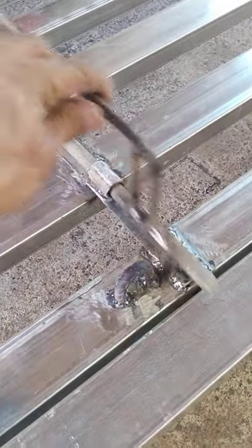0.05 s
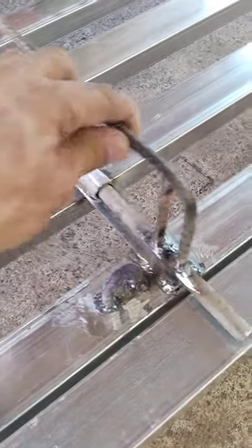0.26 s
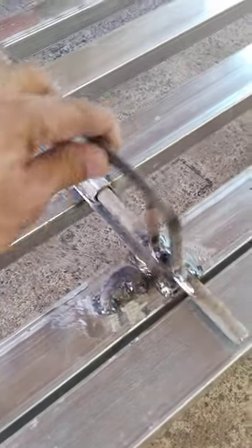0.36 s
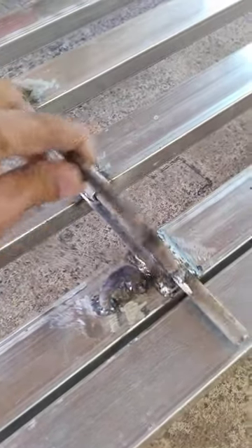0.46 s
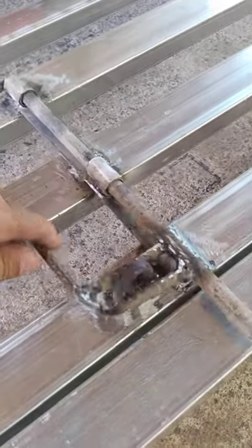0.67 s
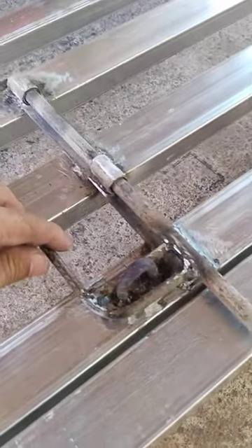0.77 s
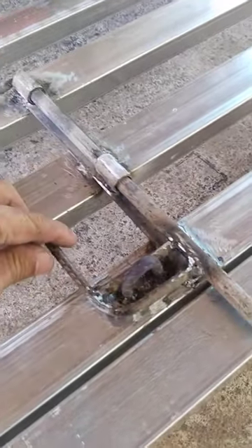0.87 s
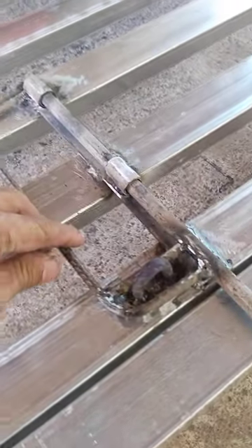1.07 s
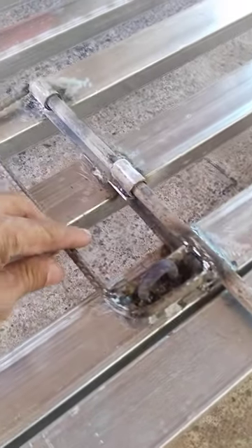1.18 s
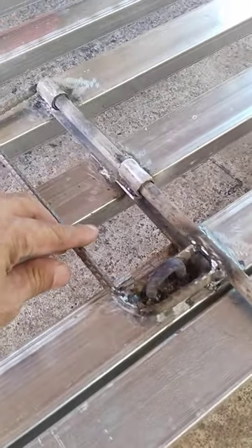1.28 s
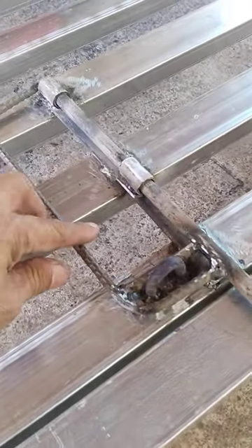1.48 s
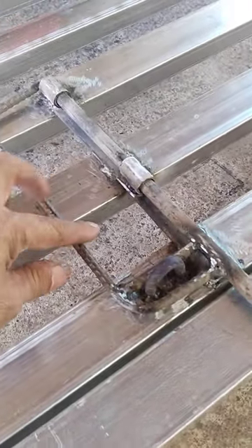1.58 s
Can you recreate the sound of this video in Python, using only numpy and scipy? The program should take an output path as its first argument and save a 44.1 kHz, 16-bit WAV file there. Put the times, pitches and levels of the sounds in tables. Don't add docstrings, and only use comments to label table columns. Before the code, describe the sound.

A steel gate bolt is slid shut, heard close on a phone microphone with slightly dulled treble. Low workshop hum and an earlier knock's fading ring open it. A gritty scrape from about 0.15 seconds ends in a hard knock at 0.29. From 0.6 the handle rubs, ticks and squeaks faintly, then clanks brightly at 0.88, and the welded tubes ring densely, dying away to the end.

```python
import sys
import numpy as np
from scipy import signal
from scipy.fft import rfft, irfft, next_fast_len
from scipy.io import wavfile
from scipy.ndimage import map_coordinates

SR = 44100
rng = np.random.default_rng(int(sys.argv[2]) if len(sys.argv) > 2 else 0)


def amp(db):
    return 10 ** (np.asarray(db, float) / 20)


def write(x):
    x = np.atleast_2d(x).T
    wavfile.write(sys.argv[1], SR, np.round(np.clip(x, -1, 1) * 32767).astype(np.int16))


N = 72765
LEAD = SR // 2

# start_s [s], strength_db [dB], hardness_corner_hz [Hz], chatter_s [s]
CONTACTS = [(.003, -47, 2000, 0.011), (.087, -50, 900, .002), (.2845, -17.5, 4000, .002),
            (.2905, -16.5, 2450, .004), (.2965, -18, 3000, 0.0048), (.666, -37.5, 1000, 0.0022),
            (.705, -44, 1180, .002), (.717, -37, 1600, 0.0017), (.732, -39, 1600, 0.0022),
            (.79, -36.5, 1300, 0.0022), (.8697, -37, 1192, .0005)]


def unit(x):
    return x / np.sqrt(np.mean(x ** 2) + 1e-20)


def unit_energy(x):
    return x / np.linalg.norm(x)


def along(points, hz):
    point_hz, value = np.transpose(points)
    return np.interp(np.log(hz + 1), np.log(point_hz + 1), value)


def filtered(x, response):
    size = next_fast_len(len(x) + SR // 2)
    return irfft(rfft(x, size) * response(np.fft.rfftfreq(size, 1 / SR)), size)[:len(x)]


def soft(x, corner_hz):
    return filtered(x, lambda f: 1 / (1 + 1j * f / corner_hz) ** 2)


def hum():
    # pitch_hz [Hz], level_db [dB per Hz]
    rumble_curve = [(25, -25), (70, -9.5), (100, -2), (150, -3), (250, -6.5), (500, -15.5), (1500, -29),
                    (10500, -43)]
    # pitch_hz [Hz], width_hz [Hz], level_db [dB over the rumble]
    motor_tones = [(98, 6, -1.5), (127.5, 7, 5.5)]
    # start_s [s], level_db [dB]
    hum_gain = [(0, -45.5), (.15, -46.5), (.3, -51.5), (.85, -54), (.95, -58), (1.2, -54.5), (1.65, -55)]

    def colour(f):
        tones = sum(amp(db) * np.exp(-((f - hz) / width_hz) ** 2) for hz, width_hz, db in motor_tones)
        return amp(along(rumble_curve, f)) * (1 + tones)

    drift_db = 1.3 * map_coordinates(rng.standard_normal(20), [np.arange(N) * 8 / SR])
    level_db = np.interp(np.arange(N) / SR, *np.transpose(hum_gain))
    return amp(level_db + drift_db) * unit(filtered(rng.standard_normal(N), colour))


def blows(contacts):
    force = np.zeros(N + LEAD + 2048)
    t = np.arange(2048) / SR
    for start_s, strength_db, corner_hz, chatter_s in contacts:
        burst = 0.31 * rng.standard_normal(len(t)) * np.exp(-t / max(chatter_s, 1e-4))
        burst[0] = 2
        burst = soft(burst, corner_hz)
        force[round(start_s * SR) + LEAD:][:len(t)] += amp(strength_db) * burst / np.abs(burst).max()
    return force[:N + LEAD]


def earlier_knock():
    past_knock = (-0.1, -11, 1800.5, -0.11)
    return blows([past_knock])


def ring(modes, length_s):
    t = np.arange(int(length_s * SR), dtype=np.float32) / np.float32(SR)
    hz, db, t60_s = np.asarray(modes, np.float32).T[:, :, None]
    phase = rng.uniform(0, 2 * np.pi, hz.shape).astype(np.float32)
    decay = np.exp(np.float32(np.log(10) / 20) * (db - 60 * t / t60_s))
    return np.sum(decay * np.sin(np.float32(2 * np.pi) * hz * t + phase), axis=0)


def dense_ring(colour):
    # pitch_hz [Hz], t60_s [s]
    frame_decay = [(300, 1.27), (700, 0.89), (1500, 0.85), (4500, 1.066), (5400, 0.7), (5900, 0.57),
                   (8000, 0.47), (11000, 0.27)]
    hz, t, bands = signal.stft(rng.standard_normal(int(1.8 * SR)), SR, nperseg=256)
    fade = amp(-60 * t / along(frame_decay, hz)[:, None])
    tail = signal.istft(bands * fade, SR, nperseg=256)[1]
    return unit_energy(filtered(tail, lambda f: amp(along(colour, f))))


def frame(force, colour, sway_db):
    # pitch_hz [Hz], level_db [dB], t60_s [s]
    tube_modes = [(725, -11, 1.3), (768, -6, 2), (1055, -2, 2.2), (1118, -9, 2.1), (1307, 2.5, 1.3),
                  (1556, 2, 1.67), (1680, -2.5, 0.76), (2075, 6, 0.98), (2340, -4.5, 1.4), (2803, -7, 1.9),
                  (3700, -8.5, 0.4), (4143, -4.5, 1.7), (4506, -2, 1.55), (5340, -7.5, 1)]
    # pitch_hz [Hz], level_db [dB]
    late_curve = [(700, -28), (1100, -2), (1550, -8), (1850, -18), (2500, -2), (3500, -12.5), (4350, -6.5),
                  (5500, -23)]
    # pitch_hz [Hz], level_db [dB], t60_s [s]
    sway_modes = [(253.6, -8, 0.85), (298.4, -2, 0.9), (325, -3, 1), (344.5, -0.5, 0.49), (409, -7, 0.26)]
    length_s, rise_s, split_hz = 1.7, 0.001, 12

    dense = dense_ring(colour)[:int(length_s * SR)]

    split = []
    for hz, db, t60_s in tube_modes:
        for twin in range(3):
            detune, uneven_db = rng.standard_normal(2)
            is_twin = twin > 0
            split.append((hz + split_hz * is_twin * detune, db - 3 * is_twin + uneven_db, t60_s))

    chance = rng.standard_normal((3, 200))
    late_hz = np.linspace(700, 5500, 200) + 8 * chance[2]
    late_db = along(late_curve, late_hz) + 3.4 * chance[0]
    late_t60_s = 1.327 * np.exp(0.21 * chance[1])
    late = np.transpose([late_hz, late_db, late_t60_s])

    answer = dense + amp(-9) * unit_energy(ring(split, length_s))
    answer = answer + amp(-8.5) * unit_energy(ring(late, length_s))
    answer = answer + amp(sway_db) * unit_energy(ring(sway_modes, length_s))
    rise = 1 - np.exp(-np.arange(len(answer)) / SR / rise_s)
    return signal.fftconvolve(force, answer * rise)[:len(force)]


def scrape(stroke):
    grains_per_s, grain_spread_db = 5000, 3
    start_s, level_db, corner_hz = np.transpose(stroke)
    t = (np.arange(N + LEAD) - LEAD) / SR
    draw = rng.random((3, len(t)))
    grain_size = amp(-grain_spread_db * np.log(draw[2] + 0.00035))
    grit = (draw[0] < grains_per_s / SR) * np.sign(draw[1] - .5) * grain_size
    bright = np.clip(np.log(np.interp(t, start_s, corner_hz) / 800) / np.log(8), 0, 1)
    force = (1 - bright) * unit(soft(grit, corner_hz=840)) + bright * unit(soft(grit, corner_hz=5900))
    return force * amp(np.interp(t, start_s, level_db, left=-120, right=-120))


def radiated(force, resonances, bare_db):
    def response(f):
        total = amp(bare_db) * (1j * f / (700 + 1j * f)) ** 2
        for k, (hz, width_hz, db) in enumerate(resonances):
            peak = 1j * f * width_hz / (hz * hz - f * f + 1j * f * width_hz)
            total = total + (-1) ** k * amp(db) * peak
        return total

    return filtered(force, response)


def bolt():
    # start_s [s], level_db [dB], grit_corner_hz [Hz]
    slide_stroke = [(.08, -77, 2000), (.15, -47, 2000), (.2, -34, 2310), (.22, -26.5, 3500),
                    (.245, -23, 3000), (.28, -23, 3000), (.3, -30.5, 2940), (.33, -52, 2990)]
    # pitch_hz [Hz], width_hz [Hz], level_db [dB]
    sleeve_resonances = [(577, 150, -5.5), (807, 202, -1), (1100, 150, -0.5), (1258, 173, 2.5),
                         (1500, 140, 1.5), (2060, 81, -18.5), (2960, 250, -5.5), (4470, 160, -24.5),
                         (4870, 560, -13.5), (6400, 460, -22), (9200, 900, -28.5)]
    slide = scrape(slide_stroke)
    knocks = amp(13) * blows(CONTACTS[:5])
    near = amp(7.5) * radiated(slide + knocks, sleeve_resonances, bare_db=-17.5)
    return near, amp(-4) * slide + amp(-10) * knocks


def bolt_stop():
    home_knock = (.289, 7.04, 5670, 0.00022)
    return blows([home_knock])


def cracks():
    crack_events = [
        (.212, -45, 6000, .2),
        (0.2846, -23.5, 2800, .1),
        (.592, -57.5, 6000, .3),
        (0.8759, -15, 1360, 0.071),
        (.8835, -21, 3500, 0.057),
    ]
    out = np.zeros(N + SR // 4)
    t = np.arange(SR // 4) / SR
    for start_s, level_db, low_hz, t60_s in crack_events:
        noise = rng.standard_normal(len(t))
        burst = unit(filtered(noise, lambda f: 1 / (1 + (low_hz / (f + 1)) ** 6)))
        out[round(start_s * SR):][:len(t)] += amp(level_db - 60 * t / t60_s) * burst
    return out[:N]


def handle_turn():
    # start_s [s], level_db [dB], grit_corner_hz [Hz]
    turn_stroke = [(.57, -77.5, 2000), (.63, -41, 1000), (.655, -36.5, 900), (.69, -35.5, 1176),
                   (.72, -34.5, 1500), (.79, -36.5, 1260), (.84, -42, 1000), (.872, -38, 1000),
                   (.885, -71.5, 1000)]
    # pitch_hz [Hz], width_hz [Hz], level_db [dB]
    hinge_resonances = [(334, 90, -6.5), (750, 114, 2.5), (1000, 190, -0.5), (1340, 170, 6.5),
                        (1500, 490, 3.5), (2080, 180, 7), (2460, 150, -10), (2800, 410, 5.5),
                        (4220, 500, -13.5), (6560, 400, -28), (8200, 250, -33)]
    turn = scrape(turn_stroke) + amp(14.5) * blows(CONTACTS[5:])
    return amp(9) * radiated(turn, hinge_resonances, bare_db=-22.5), amp(1.5) * turn


def squeaks():
    squeak_events = [(.705, .02, 6600, -52), (.77, .03, 8100, -55), (.832, .022, 8200, -49)]
    width_hz = 360
    out = np.zeros(N + SR // 4)
    t = np.arange(SR // 4) / SR
    for start_s, length_s, hz, level_db in squeak_events:
        noise = rng.standard_normal(len(t))
        narrow = unit(filtered(noise, lambda f: np.exp(-((f - hz) / width_hz) ** 2)))
        swell = np.sin(np.pi * np.clip(t / length_s, 0, 1))
        out[round(start_s * SR):][:len(t)] += amp(level_db) * swell * narrow
    return out[:N]


def handle_clank():
    clank_blow = (.8757, -6, 14001, .0003)
    # pitch_hz [Hz], level_db [dB], t60_s [s]
    handle_modes = [(727, -12.5, 0.53), (781, -10.5, 0.34), (840, -6.5, .15), (1600, -5.5, .05),
                    (2325, 6.5, 0.019), (3693, -3.5, 0.29), (4060, -7.5, 0.2), (4900, -6, 0.24),
                    (5250, -6.5, 0.37), (6573, -14.5, 0.12), (8300, -24.5, .12), (9030, -21.5, .1)]
    clank = blows([clank_blow])
    own_ring = signal.fftconvolve(clank, ring(handle_modes, .5))[:len(clank)]
    return amp(-16.5) * own_ring, amp(19) * clank


def scene():
    # pitch_hz [Hz], level_db [dB]
    bolt_colour = [(200, -34.5), (480, -22.5), (750, -6), (930, -10.5), (1300, -1), (3300, -10.5),
                   (5200, -8.5), (10600, -10.5)]
    # pitch_hz [Hz], level_db [dB]
    strike_colour = [(250, -41), (550, -23), (760, -3), (930, -18.5), (1400, 0), (3200, -10), (5000, -7.5),
                     (10600, -9.5)]
    bolt_near, bolt_drive = bolt()
    turn_near, turn_drive = handle_turn()
    clank_near, clank_drive = handle_clank()
    near = bolt_near + turn_near + clank_near
    rubbed = frame(bolt_drive + turn_drive, bolt_colour, sway_db=-27)
    stopped = frame(bolt_stop(), bolt_colour, sway_db=-25.5)
    struck = frame(clank_drive + earlier_knock(), strike_colour, sway_db=-36)
    gate = (near + rubbed + stopped + struck)[LEAD:]
    return (gate + cracks() + squeaks() + hum())[None]


def top_cut(x):
    return signal.sosfilt(signal.butter(12, 10690, fs=SR, output="sos"), x)


def record(dry):
    mix = filtered(dry[0], lambda f: np.where(f < 10750, 1, amp(-46) * (f < 15500)))[None]
    return top_cut(mix)


dry = scene()
out = record(dry)
write(out)
```